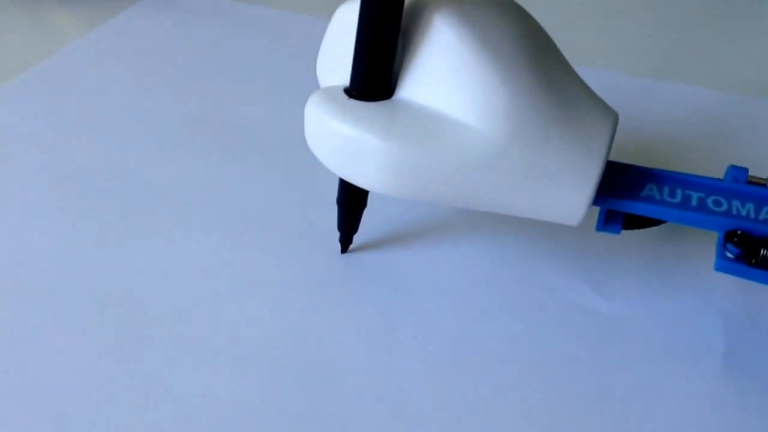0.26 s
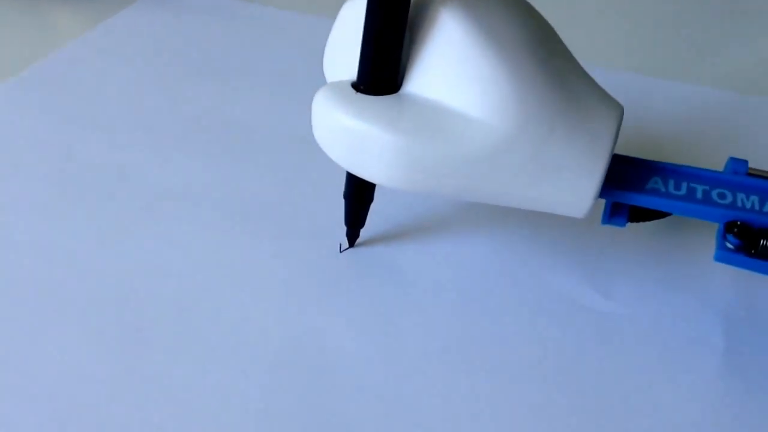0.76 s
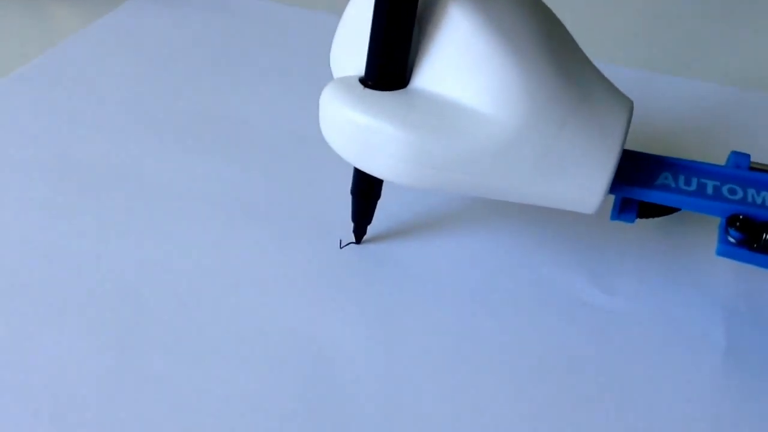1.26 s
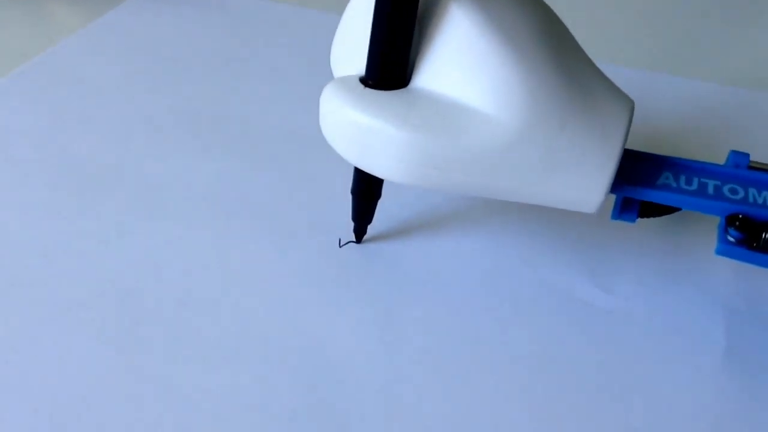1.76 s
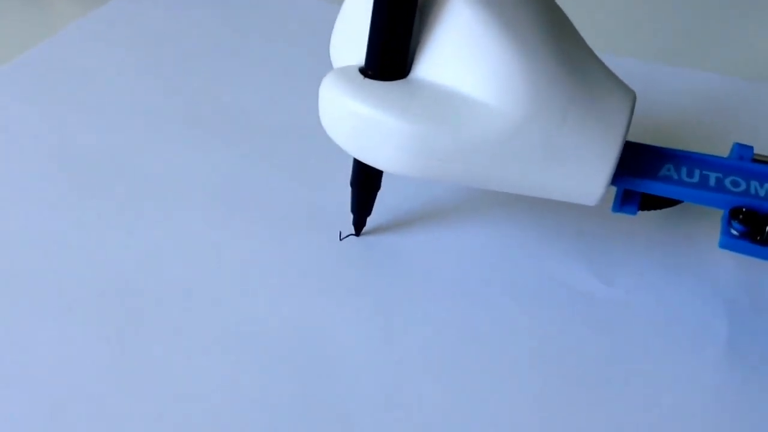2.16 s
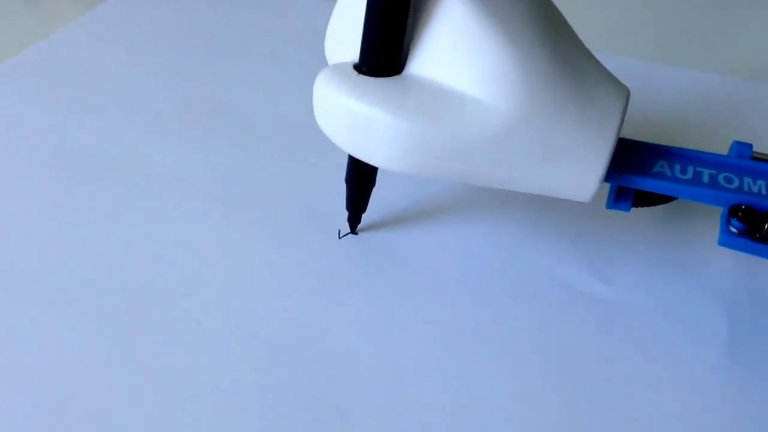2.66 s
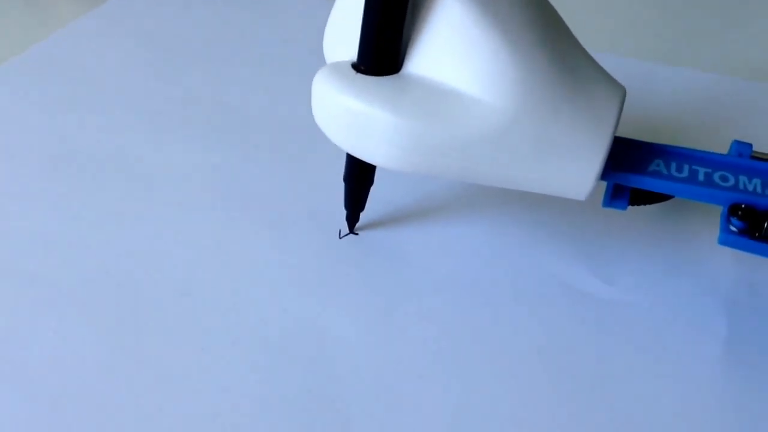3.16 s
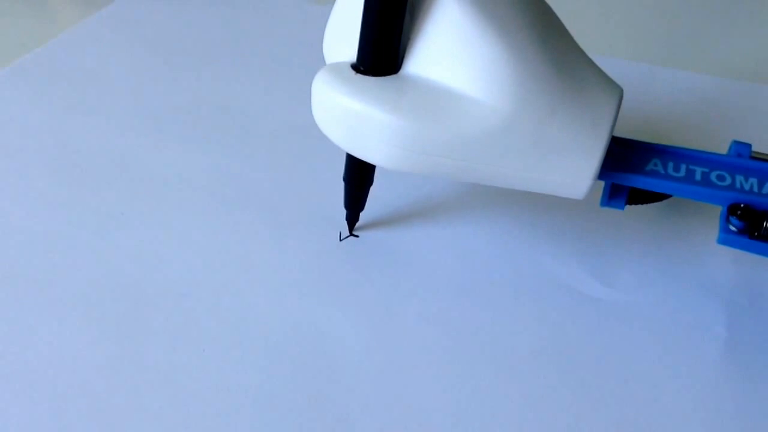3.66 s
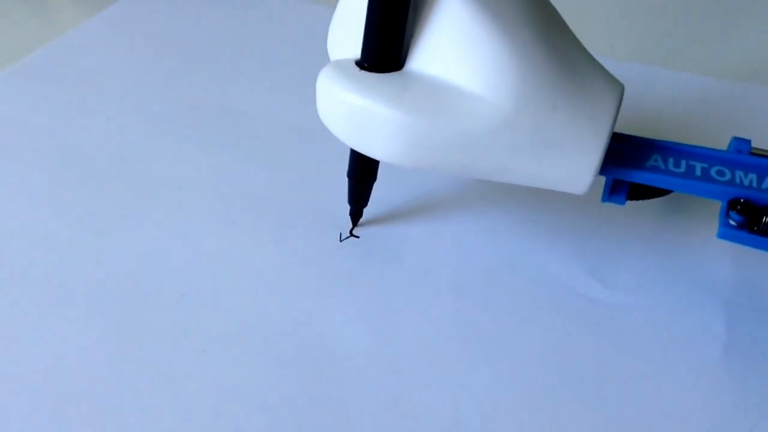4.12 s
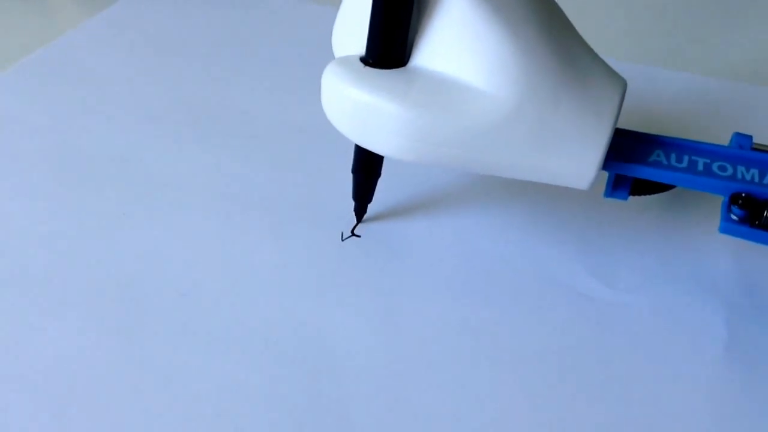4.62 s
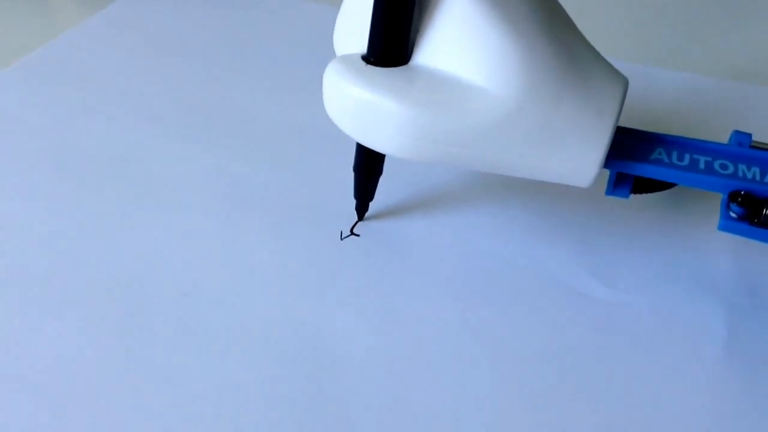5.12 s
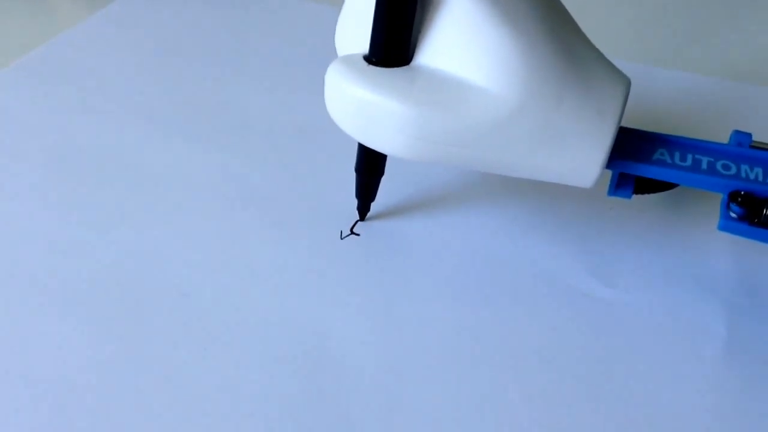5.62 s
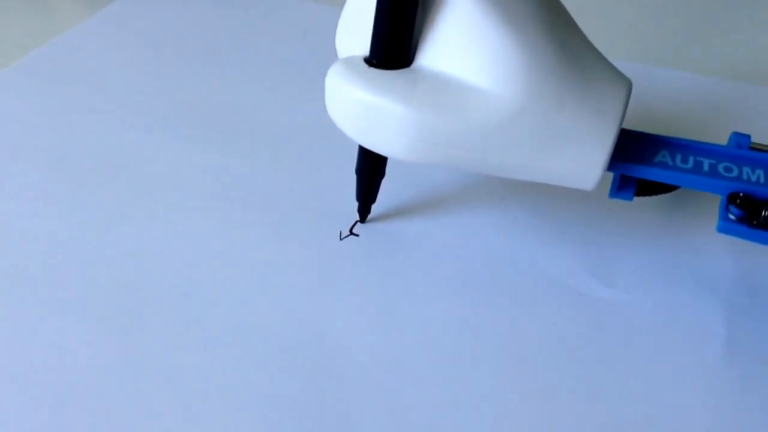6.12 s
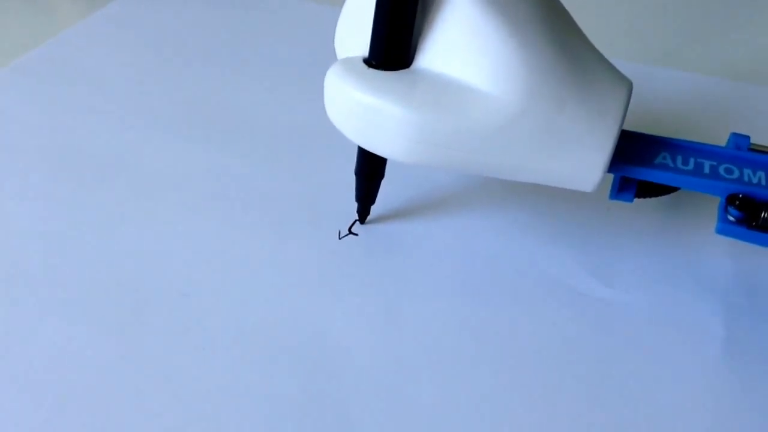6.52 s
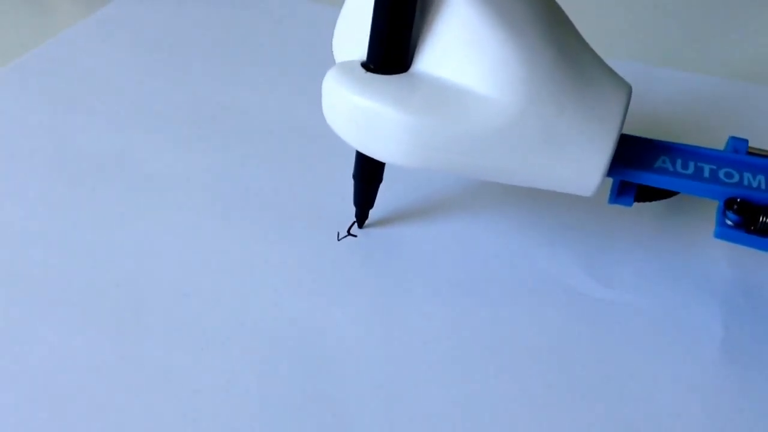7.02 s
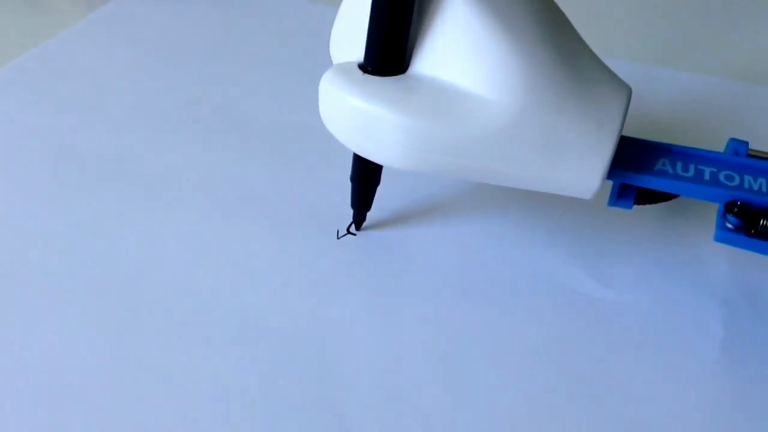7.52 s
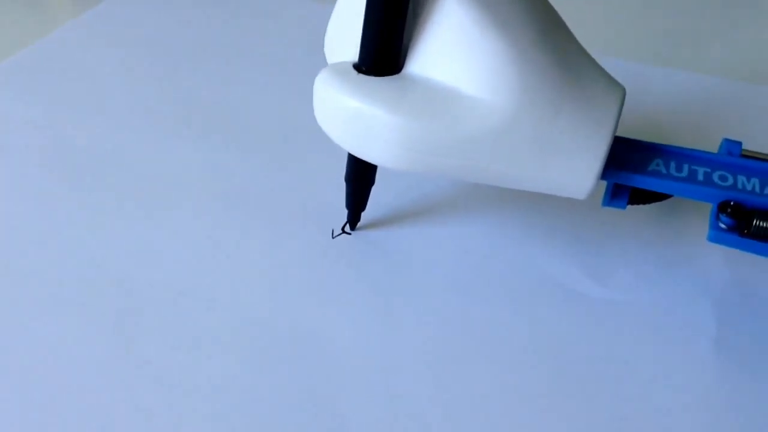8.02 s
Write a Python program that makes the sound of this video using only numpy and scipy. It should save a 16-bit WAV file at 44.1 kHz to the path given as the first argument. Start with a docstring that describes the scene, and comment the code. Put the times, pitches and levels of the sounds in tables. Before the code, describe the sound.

Continuous, fast plastic gear chatter, already running at the start and still running at the end. It begins rough and scraping, loses its growl from around two seconds, and settles into a thinner, steady rattle with hissy motor scratching. Short clicks from loose joints come at random, mostly early. Faint hum and table drumming sit underneath. Close mono pickup, small room, barely any echo.

```python
"""Plastic gears rattle close to a mono microphone: a drawing automaton at work on a table.
The pinion knocks on gear teeth and rings the frame, with a harsher rasp while the cams bear hard.
The motor's brushes fizz on top as random scratches, and loose linkages tick in short bursts.
Underneath are the motor's hum, a few shaft tones, and the drumming table top; near walls echo weakly."""
import sys
import numpy as np
from scipy import signal
from scipy.fft import rfft, irfft, next_fast_len
from scipy.io import wavfile
from scipy.ndimage import map_coordinates

SR = 44100
rng = np.random.default_rng(int(sys.argv[2]) if len(sys.argv) > 2 else 0)


def log_audio(samples):
    """Write samples as a 16-bit WAV file to the path given in sys.argv[1]."""
    # one column per channel
    frames = np.atleast_2d(samples).T
    # limit to full scale, then quantise
    limited = np.clip(frames, -1, 1)
    pcm = np.round(limited * 32767).astype(np.int16)
    wavfile.write(sys.argv[1], SR, pcm)


N = 365148

# motor shaft speed: (time [s], speed [turns/s])
SHAFT_SPEED = [(0.0, 123.0), (1.25, 121.5), (1.7, 123.1), (2.3, 123.2), (2.8, 122.5), (4.1, 122.8),
               (5.45, 121.8), (6.4, 122.6), (7.25, 122.6), (7.85, 123.7), (8.28, 123.7)]
# slow drift of the whole mechanism: (time [s], level [dB])
LEVEL_DRIFT = [(0.0, -0.0), (2.8, 0.84), (3.8, -0.1), (4.6, 0.25), (6.8, -0.5), (7.4, -0.2), (8.28, 0.3)]
# loudest linkage ticks, as struck on the frame: (time [s], strength [dB])
LOUD_TICKS = [(0.324, -6), (0.553, -13), (0.587, -8), (0.66, -7), (1.54, -9), (1.977, -9), (3.061, -8.5),
              (4.79, -7), (7.254, -4)]
# resonances of the plastic frame: (frequency [Hz], width [Hz], lift [dB])
FRAME_MODES = [(1385, 20, 7.5), (1819, 28, 8.0), (1872, 41, 5.5), (2228, 58, 9.0), (2308, 116, 11.0),
               (2525, 70, 5.5), (2769, 35, 4.5), (2953, 114, 5.0), (3078, 165, 7.0), (3287, 60, 4.5),
               (3394, 36, 5.5), (3653, 124, 9.0), (4377, 106, 3.0), (4968, 187, 5.5), (6198, 192, 3.5),
               (6562, 154, 5.0), (6774, 29, 3.0), (6963, 25, 2.5), (7456, 56, 3.5), (11077, 390, 4.5),
               (11925, 156, 3.0), (13469, 243, 4.5), (13868, 133, 4.0), (14329, 237, 5.0), (15005, 84, 4.0)]
# resonances of the table top: (frequency [Hz], width [Hz], lift [dB])
TABLE_MODES = [(138, 8.9, 9.5), (202.6, 8.1, 12.5), (261, 27, 6), (309, 14, 5.5), (374.5, 28, 12),
               (735, 155, 5)]
# broad colours of the contacts, before the resonances: (frequency [Hz], relative level [dB])
TEETH_COLOUR = [(300, -50), (700, -27.5), (1050, -14.5), (1150, -7.5), (1700, -6.5), (2100, -5), (2500, 0),
                (2750, -1.5), (4000, -2.5), (5000, -0.5), (7300, -4.5), (9000, -10.5), (15000, -16)]
RASP_COLOUR = [(500, -45.5), (1800, -19.5), (2700, -3), (3250, 1), (3900, 0.5), (4700, -3.5), (5600, -8),
               (6700, -3.5), (7900, -3.5), (9200, -12.5), (15000, -25)]
FIZZ_COLOUR = [(2000, -38), (6000, -18), (9000, -4), (10400, -3.5), (11200, -3), (12500, -1), (13100, -0.5),
               (15300, -2)]
RUMBLE_COLOUR = [(20, -50), (38, -44), (50, -27), (95, -22), (120, -11.5), (170, -9), (260, -4),
                 (440, -2.5), (720, 1.5), (1000, -6), (2000, -11.5), (5000, -43)]
# motor hum; three poles give 3, eight pinion teeth give 8: (multiple of shaft rate, mean level [dB])
HUM_TONES = [(1, -64.5), (2, -69), (3, -57), (6, -64), (8, -53.3)]

PINION_TEETH = 8
WHEEL_RATIO = 8 / 34  # turns of the first wheel per shaft turn
TOP_HZ = 15330  # band limit
# the cams bear hard until RELEASE_S, then their load dies away with time constant EASE_S
RELEASE_S, EASE_S = 1.75, 1.34
# levels ahead of the drift: running free, and what full cam load adds (dB)
RATTLE_DB, RATTLE_LOAD_DB = -20.5, 1.13
RASP_DB, RASP_LOAD_DB = -26.0, 9.6
DRUMMING_DB, FIZZ_DB = -46, -23
# a faster motor is louder (dB for each extra turn per second)
RATTLE_SPEED_DB, DRUMMING_SPEED_DB = 0.33, 0.7
# random motor surges: depth in brushes and gears (dB), knots per second
SURGE_FIZZ_DB, SURGE_GEARS_DB, SURGE_RATE = 0.7, 0.21, 12
# lesser ticks: number per second at full load, mean strength (dB), scatter (dB)
SMALL_TICK_RATE, SMALL_TICK_DB, SMALL_TICK_SCATTER_DB = 4, -24, 1
# the rasp's low growl needs more load than its bright edge: their border (Hz), power of the load
RASP_BORDER_HZ, GROWL_POWER = 4500, 3.4


def amp(db):
    """Decibels to an amplitude factor."""
    return 10 ** (np.asarray(db) / 20)


def unit(x):
    """x scaled to an RMS of one."""
    return x / np.sqrt(np.mean(x ** 2) + 1e-20)


def curve(rows):
    """A (time, value) table as one value per sample."""
    time, value = np.transpose(rows)
    return np.interp(np.arange(N) / SR, time, value)


def wobble(rate):
    """A smooth random curve, rate knots a second."""
    knots = rng.standard_normal(int(N * rate / SR) + 4)
    return map_coordinates(knots, [np.arange(N) * rate / SR])


def swing(turns):
    """Once-a-turn rise and fall of an off-centre wheel."""
    return np.cos(2 * np.pi * turns)


def contacts(density, scatter_db):
    """Tiny random impacts, density a second, of uneven size."""
    struck = rng.random(N) < density / SR
    size_db = scatter_db * np.clip(rng.standard_normal(N), -2, 2)
    return unit(struck * rng.choice([-1, 1], N) * amp(size_db))


def ring(x, colour, modes, size=16384):
    """x through a causal body: a broad colour lifted at each resonance."""
    hz = np.fft.rfftfreq(size, 1 / SR)
    f, level = np.transpose(colour)
    db = np.interp(np.log(hz + 1), np.log(f), level)
    for centre, width, lift in modes:
        db = db + lift / (1 + (2 * (hz - centre) / width) ** 2)
    # folding the cepstrum forward gives minimum phase: the ringing follows the blow
    cepstrum = irfft(np.log(amp(db)))[:size // 2]
    cepstrum[1:] *= 2
    response = irfft(np.exp(rfft(cepstrum, size)))
    return signal.fftconvolve(x, response)[:N]


def chatter(rate=130, life=0.0027):
    """Jumps through the backlash: each random jolt starts at once and fades; the play limits its size."""
    jolts = (rng.random(N) < rate / SR) * rng.uniform(0.23, 1, N)
    fading = signal.lfilter([1], [1, -np.exp(-1 / (life * SR))], jolts)
    limited = np.tanh(2 * fading)
    return unit(limited - limited.mean())


def room(x, t60=0.072):
    """The near walls return a weak, dense echo from 2 ms on, dying by 60 dB in t60 seconds."""
    t = np.arange(SR // 3) / SR
    tail = rng.standard_normal(len(t)) * amp(-60 * t / t60) * (t > .002)
    echo = signal.fftconvolve(x, tail / np.linalg.norm(tail))[:N]
    return x + amp(-12) * echo


def table_drumming(overspeed):
    """The table top drums under the machine: random contacts ring its low resonances."""
    drumming = unit(ring(contacts(density=2500, scatter_db=3.5), RUMBLE_COLOUR, TABLE_MODES))
    return amp(DRUMMING_DB + DRUMMING_SPEED_DB * overspeed) * drumming


def motor_hum(turns):
    """Tones at multiples of the shaft rate, slightly unsteady in level and phase."""
    hum = np.zeros(N)
    for order, db in HUM_TONES:
        level = amp(db + 2.2 * wobble(14)) * np.sqrt(2)
        hum += level * swing(order * turns + .055 * wobble(22))  # phase jitter in turns
    return hum


def cam_load():
    """How hard the cams bear, 0-1: full at first, then easing off exponentially."""
    return np.exp(-np.maximum(np.arange(N) / SR - RELEASE_S, 0) / EASE_S)


def pressure(turns, shaft_db, twice_db, wheel_db, chatter_db, lurch_db):
    """Tooth force in dB: it follows the shaft and the first wheel, chatters in the backlash and lurches."""
    shaft = shaft_db * swing(turns) + twice_db * swing(2 * turns + 1 / 8)
    wheel = wheel_db * swing(WHEEL_RATIO * turns)
    return shaft + wheel + chatter_db * chatter() + lurch_db * wobble(38)


def linkage(load, life=0.0029):
    """A loose joint drops through its play: a short burst of contacts into the frame."""
    blows, t = np.zeros(N + SR), np.arange(SR // 20) / SR
    # lesser ticks come at random, more often under load
    small_times = np.flatnonzero(rng.random(N) < SMALL_TICK_RATE * load / SR) / SR
    small = [(s, rng.normal(SMALL_TICK_DB, SMALL_TICK_SCATTER_DB)) for s in small_times]
    for s, db in LOUD_TICKS + small:
        burst = np.exp(-t / life) * rng.standard_normal(len(t))
        blows[round(s * SR):][:len(t)] += amp(db) * burst
    return ring(blows[:N], TEETH_COLOUR, FRAME_MODES)


def brushes(turns, force_db, fizz_db):
    """The brushes scratch over the commutator, harder on one side of each turn, and skip at random."""
    skip_db = 0.97 * chatter(rate=60, life=0.0057)
    scratch_db = 0.66 * force_db + skip_db + 0.33 * swing(turns)
    scratch = contacts(density=14000, scatter_db=3.5) * amp(scratch_db)
    return amp(fizz_db) * unit(ring(scratch, FIZZ_COLOUR, FRAME_MODES))


def gear_rattle(mesh, load, overspeed):
    """Teeth knock as they mesh: the tooth force shapes random impacts that ring the frame."""
    knocks = mesh * contacts(density=12000, scatter_db=2)
    rattle_db = RATTLE_DB + RATTLE_LOAD_DB * load + RATTLE_SPEED_DB * overspeed
    return amp(rattle_db) * unit(ring(knocks, TEETH_COLOUR, FRAME_MODES))


def gear_rasp(mesh, load):
    """Loaded teeth also scrape, with a harsher colour whose growl fades first as the load eases."""
    scrapes = mesh * amp(1.56 * chatter()) * contacts(density=14000, scatter_db=2)
    rasp = unit(ring(scrapes, RASP_COLOUR, FRAME_MODES))
    lowpass = signal.butter(2, RASP_BORDER_HZ, fs=SR, output="sos")
    growl = signal.sosfiltfilt(lowpass, rasp)
    edge = rasp - growl
    scrape = amp(RASP_LOAD_DB * load ** GROWL_POWER) * growl + amp(RASP_LOAD_DB * load) * edge
    return amp(RASP_DB) * scrape


def gears(turns, force_db, load, overspeed):
    """The same tooth force, pulsing at each pinion tooth, drives both the rattle and the rasp."""
    mesh = amp(force_db + 1.4 * swing(PINION_TEETH * turns))
    return gear_rattle(mesh, load, overspeed) + gear_rasp(mesh, load)


def scene():
    """One shaft drives everything; its speed, its surges and the cam load set the levels."""
    speed = curve(SHAFT_SPEED)
    turns, overspeed = np.cumsum(speed) / SR, speed - speed.mean()
    load, surge = cam_load(), wobble(SURGE_RATE)
    force_db = pressure(turns, shaft_db=0.62, twice_db=-0.14, wheel_db=0.6, chatter_db=1.38, lurch_db=0.59)
    under = motor_hum(turns) + table_drumming(overspeed)
    ticks = linkage(load)
    fizz = brushes(turns, force_db, FIZZ_DB + SURGE_FIZZ_DB * surge)
    teeth = gears(turns, force_db + SURGE_GEARS_DB * surge, load, overspeed)
    mono = amp(curve(LEVEL_DRIFT)) * (under + room(teeth + fizz + ticks))
    return np.array([mono, mono])  # one microphone on both channels


def record(dry):
    """Peaks round off near full scale; deep bass is cut and nothing passes above the band limit."""
    rounded = dry / (1 + dry ** 16) ** (1 / 16)
    highpass = signal.butter(4, 62, "highpass", fs=SR, output="sos")
    thinned = signal.sosfilt(highpass, rounded)
    size = next_fast_len(N + SR // 2)
    passband = np.fft.rfftfreq(size, 1 / SR) < TOP_HZ
    return irfft(rfft(thinned, size) * passband, size)[:, :N]


dry = scene()
out = record(dry)
log_audio(out)
```